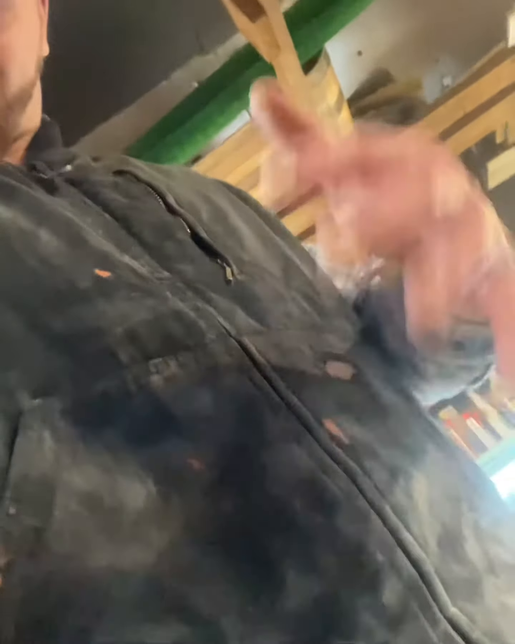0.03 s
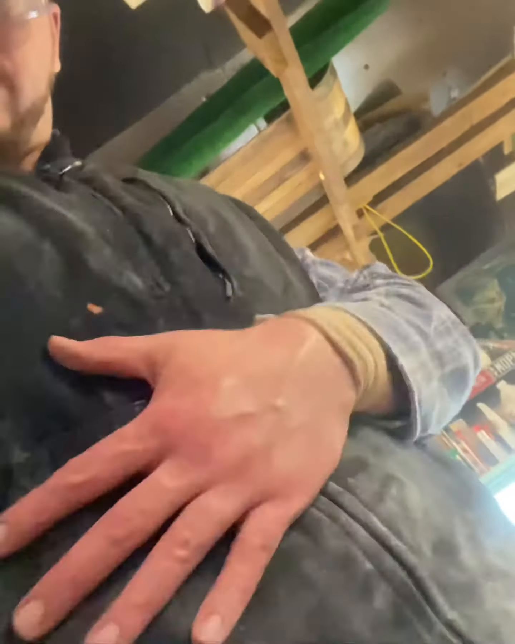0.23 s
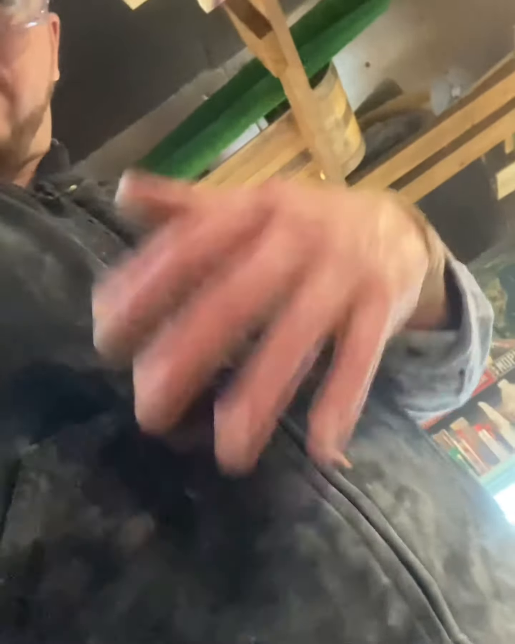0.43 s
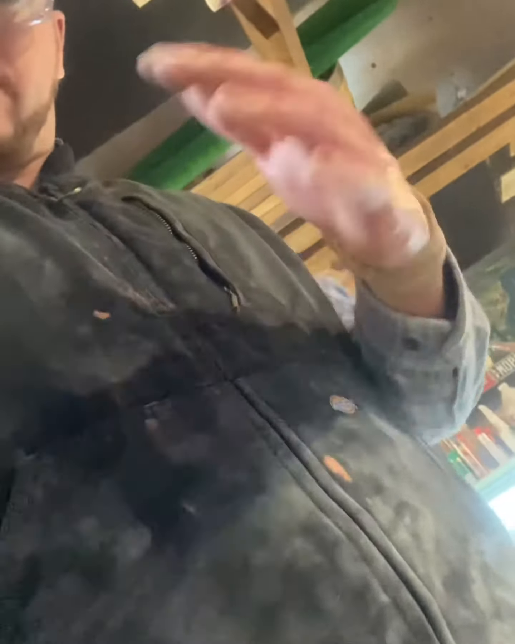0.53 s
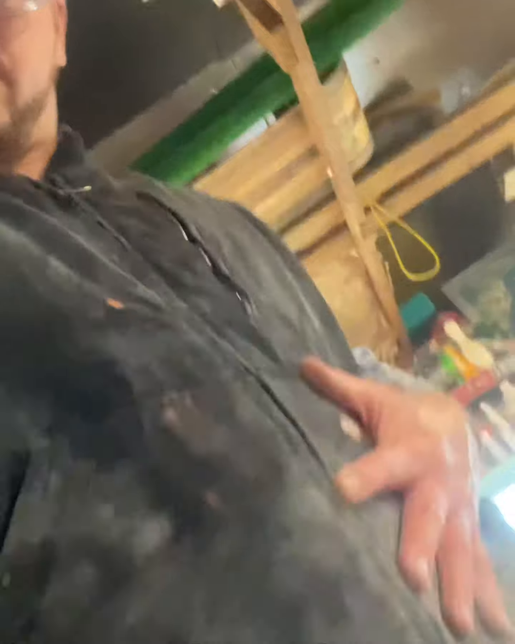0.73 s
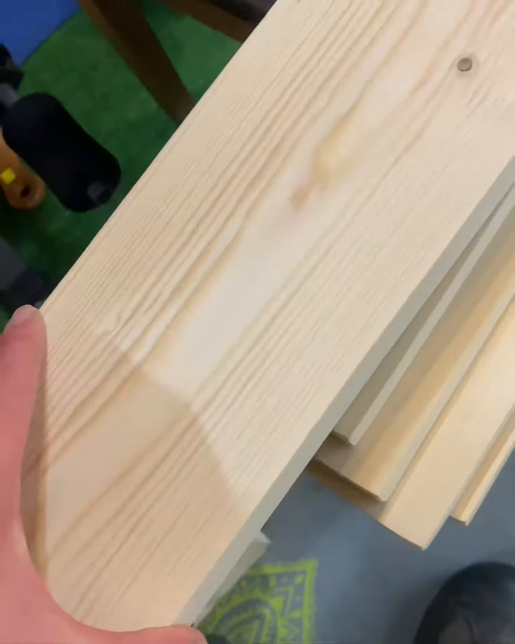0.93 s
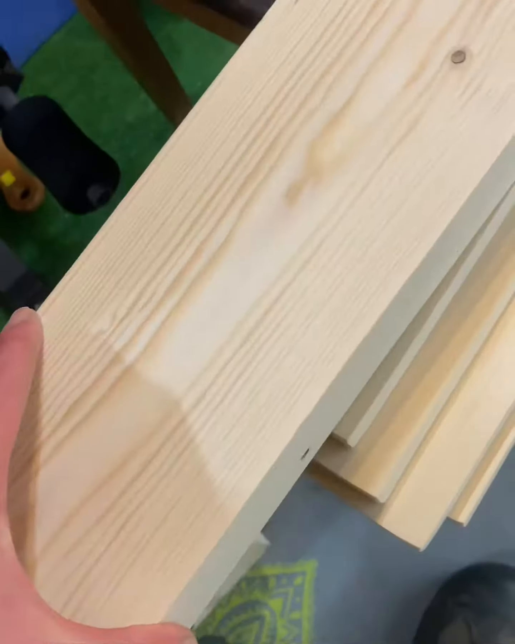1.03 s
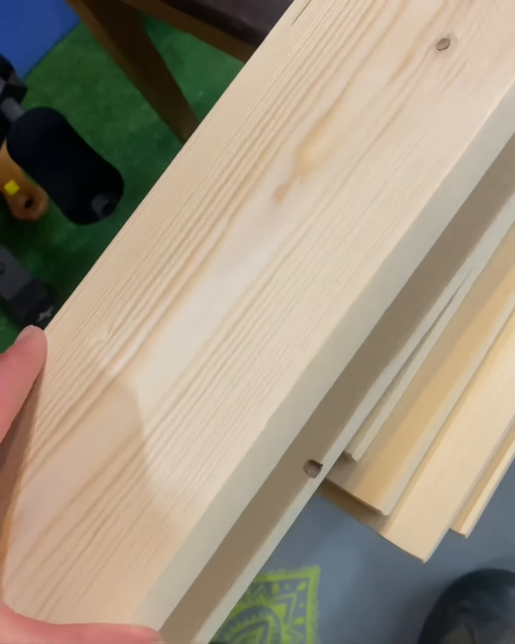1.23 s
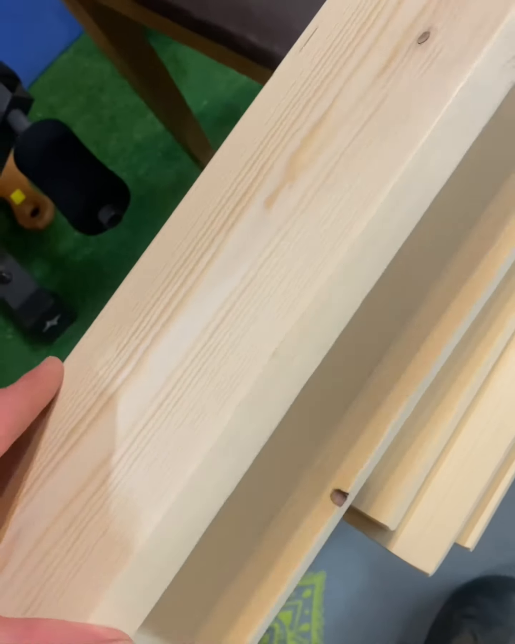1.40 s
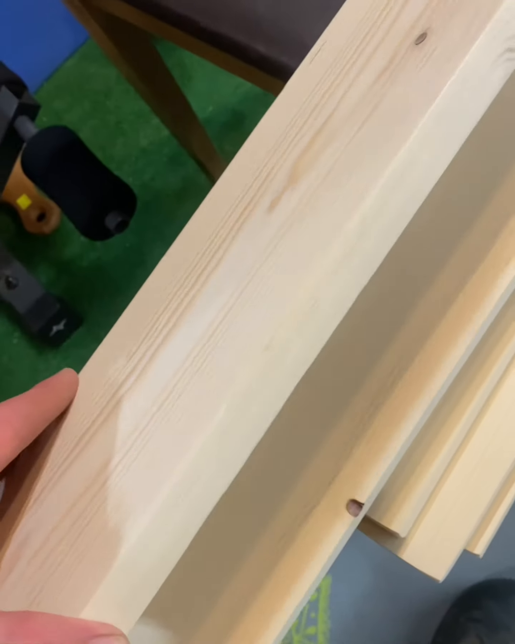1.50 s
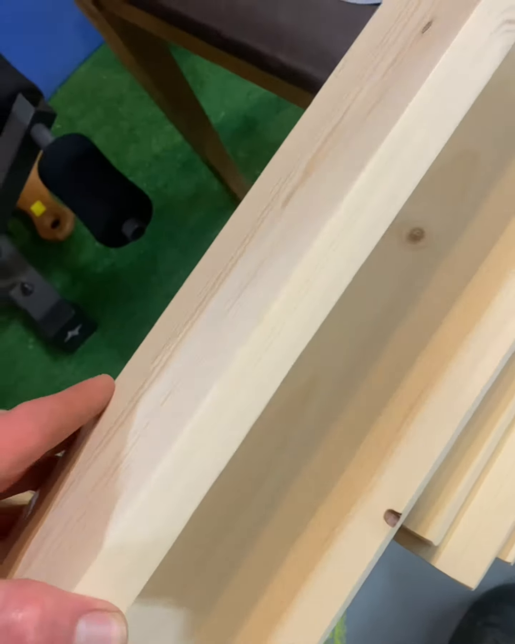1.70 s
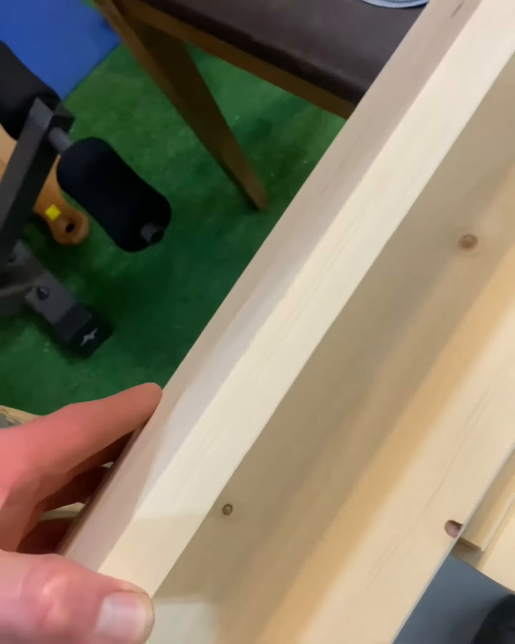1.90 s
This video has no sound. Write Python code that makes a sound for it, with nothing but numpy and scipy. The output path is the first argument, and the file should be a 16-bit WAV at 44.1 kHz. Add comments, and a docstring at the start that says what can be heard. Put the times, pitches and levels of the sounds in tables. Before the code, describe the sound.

Two quick, sharp slaps land on a padded jacket half a second apart, very near the microphone in a small workshop. Faint handling rumble runs underneath, and afterwards a low fan hum suddenly grows clearer and slightly whines.

```python
"""A small workshop, a phone's microphone held close to a padded work jacket, the stereo widened.
A hand slaps the jacket twice: cloth brushes, fingers and palm crack down, trapped air pops,
the chest thumps and the room rings briefly. The phone rumbles as it is moved in the other hand.
After the second slap the muffled background hum abruptly turns louder and clearer; a thin whine joins."""
import sys
import numpy as np
from scipy import signal
from scipy.fft import rfft, irfft
from scipy.io import wavfile
from scipy.ndimage import uniform_filter1d, minimum_filter1d

SR = 44100
rng = np.random.default_rng(int(sys.argv[2]) if len(sys.argv) > 2 else 0)


def to_wav(s):
    """Save 16-bit WAV."""
    ch = np.atleast_2d(s).T  # columns
    pcm = np.round(np.clip(ch, -1, 1) * 32767)  # PCM
    wavfile.write(sys.argv[1], SR, pcm.astype(np.int16))


N = 85995

# the flat palm, then the brighter fingers
# (time [s], cloth [dB], room [dB], hollow ring [dB], knock band [dB], snap band [dB])
SLAPS = [(0.1845, -16.5, -26.5, 1.5, 1, -4), (0.6695, -19, -24, -5.5, -3, 2)]
# stereo widening of the room sound, nearly opposite in the mids (frequency [Hz], lead of the left [rad])
ROOM_PHASE = [(60, 0.13), (130, 0.54), (260, 1.75), (600, 2.766), (850, 2.59), (1100, 2.92), (1800, 2.2),
              (4500, 1.64), (8000, 0.27)]


def slap(t, time, cloth_db, cup_db, knock_db, snap_db):
    """Each contact cracks on the fabric and squeezes out a pocket of air, right by the microphone."""
    # fingers and palm landing (time [s], crack [dB], air pop [dB], pop pitch [Hz], pop decay [s])
    contacts = [(0.1769, -15, -20.5, 520, 0.0027), (0.1846, -8, -7, 612, 0.0028),
                (0.1861, 2.5, -14, 1020, 0.0017), (0.1873, -0.5, -7.5, 393, .003),
                (0.1881, -6.5, -8, 605, 0.0026), (0.1950, -17.5, -22, 660, 0.0037),
                (0.6585, -24, -18.5, 810, 0.004), (0.6606, -37, -30, 790, 0.0022),
                (0.6684, 1, -8, 687, 0.0019), (0.6703, -5, -14.5, 375, 0.0023),
                (0.6734, -3.5, -16, 384, 0.0038), (0.6755, -11.5, -9.5, 680, 0.0013),
                (0.696, -27, -40, 710, .003)]
    # colour of struck fabric (frequency [Hz], level [dB])
    crack_colour = [(100, -14.5), (400, 4.5), (900, 5.5), (1500, 1), (2200, 1.5), (3300, 1), (5500, -4.5),
                    (7200, -11.5), (10000, -33), (13000, -53)]
    cracks, pops = np.zeros(N), np.zeros(N)
    grit, grit_decay_s = 0.077 * rng.standard_normal(N), 0.0017
    for start, crack_db, pop_db, hz, decay in contacts:
        if abs(start - time) < .1:  # the contacts of this slap
            cracks[int(start * SR)] += undb(crack_db)
            cracks += undb(crack_db) * grit * (t > start) * np.exp(-np.abs(t - start) / grit_decay_s)
            pop = sagging_ring(t - start, hz, hz * 0.76, sag_s=0.0059, rise_s=0.00075, decay_s=decay)
            pops += undb(pop_db) * pop
    sound = strike(cracks, crack_colour) + undb(cup_db) * cup(cracks) + pops
    sound += undb(cloth_db) * cloth(t - time)
    tone_db = knock_db * bell(hz=1050) + snap_db * bell(hz=4430)
    return irfft(rfft(sound) * undb(tone_db), N)


def cup(cracks):
    """The hollow under the hand rings for a few milliseconds."""
    # rings of the cupped hand and taut fabric (frequency [Hz], level [dB], decay [s])
    modes = [(560, -45, 0.0054), (1000, -25, 0.0027), (1360, -24, 0.006), (1880, -40, 0.0015),
             (2300, -18, 0.0036), (3240, -20, 0.0022), (5090, -21, 0.0011)]
    age = np.arange(2048) / SR
    ring = sum(undb(db) * np.sin(2 * np.pi * hz * age) * np.exp(-age / decay) for hz, db, decay in modes)
    return signal.fftconvolve(cracks, ring)[:N]


def cloth(age):
    """The jacket crinkles under the hand: a quick press inside a longer, softer brush."""
    # colour of crinkling cloth (frequency [Hz], level [dB])
    colour = [(60, 14), (180, -14), (320, 4.5), (750, 13), (1000, 9), (1500, 6.5), (3000, -11),
              (5600, -9.5), (7500, -21.5), (10500, -40), (13000, -52)]
    press = swell(age, rise_s=0.0019, fall_s=0.0046)
    brush = undb(-2.5) * swell(age, rise_s=0.0073, fall_s=0.0095)
    grain_depth = 0.27
    grain = np.exp(grain_depth * walk(1200) - grain_depth ** 2)
    return (press + brush) * grain * noise(colour)


def chest(t):
    """Chest and padding give way under the hand with a low, falling thump."""
    # (time [s], first pitch [Hz], last pitch [Hz], level [dB], rise [s], decay [s])
    thumps = [(0.1906, 93, 40.5, -12.5, 0.0143, 0.014), (0.6791, 155, 98, -14, 0.005, 0.0049),
              (0.7040, 62, 53, -34.5, 0.0036, 0.048)]
    return sum(undb(db) * sagging_ring(t - start, first, last, sag_s=0.021, rise_s=rise, decay_s=decay)
               for start, first, last, db, rise, decay in thumps)


def room_tails(t):
    """The workshop rings briefly after each slap, and a faint hiss lingers."""
    # colours of the room's ring and of the hiss (frequency [Hz], level [dB])
    ring_colour = [(60, -17), (200, 6), (330, 6), (760, 10.5), (1000, 4), (2500, -10), (5500, -10),
                   (8000, -28.5), (11000, -35), (14000, -50)]
    hiss_colour = [(300, -2), (2000, -6), (4000, -4.5), (6300, -2.5), (8000, -14.5), (11000, -21),
                   (13000, -22)]
    build_s, decay_s = 0.0058, 0.026
    hiss_db, hold_s, fade_s = -54.5, 0.12, 0.032
    ring = sum(undb(db) * swell(t - time - build_s, build_s / 2, decay_s) for time, _, db, *_ in SLAPS)
    linger = sum((t > time) * np.exp(-np.maximum(t - time - hold_s, 0) / fade_s) for time, *_ in SLAPS)
    return ring * field(ring_colour) + undb(hiss_db) * linger * field(hiss_colour)


def handling(t):
    """Low rumble of the phone moving in the other hand."""
    # colour of the rumble (frequency [Hz], level [dB])
    colour = [(15, -19), (30, -12.5), (55, 10), (75, -1), (110, -7.5), (200, -22), (600, -74.5)]
    # its swells (time [s], level [dB])
    level = [(0, -46), (.15, -48.5), (.25, -52), (.33, -42.5), (.45, -50.5), (.62, -40), (.78, -47.5),
             (.86, -35.5), (.98, -54), (1.3, -68.5), (1.75, -62), (1.86, -51.5), (1.95, -63)]
    return undb(np.interp(t, *np.array(level).T)) * field(colour)


def machine(t):
    """A fan runs in the background: rushing air and hum, muffled, then abruptly louder and clearer."""
    # colours of the rushing air (frequency [Hz], level [dB])
    muffled_colour = [(30, -39), (100, -17), (160, -5), (210, -8), (370, 1), (600, -5.5), (850, -0.5),
                      (1150, -6.5), (1800, -5), (2600, -15), (4200, -13.5), (6200, -20.5), (8000, -36.5),
                      (10500, -43.5), (13000, -56)]
    clear_colour = [(25, -6.5), (55, 5), (120, -4), (190, -2.5), (250, 1), (380, 3.5), (520, -4.5),
                    (620, 1.5), (780, -5), (900, 1), (1030, 4), (1200, -6.5), (1700, -6.5), (2200, -12),
                    (2600, -11.5), (3600, -14.5), (4500, -12), (6200, -24.5), (7600, -44), (10500, -38),
                    (13000, -49)]
    # stereo widening of the fan (frequency [Hz], lead of the left [rad])
    phase = [(60, .1), (130, 2.2), (230, 2.25), (350, 2.43), (550, 2.82), (790, 3.08), (1050, 3.45),
             (1250, 2.18), (1900, 2.03), (2170, 1.3), (2700, 2.43), (4200, 1.36), (8000, .8)]
    clears_s, crossfade_s = .927, 0.0043
    clear = np.clip((t - clears_s) / crossfade_s + .5, 0, 1)
    air = (1 - clear) * undb(-50) * field(muffled_colour)
    air += clear * undb(-43.5) * field(clear_colour, phase)
    return air + widen_room(fan_hum(clear), fan_hum(clear), phase)


def fan_hum(clear):
    """The fan's hum wavers in pitch and level; a thin whine joins as the sound turns clearer."""
    # hum lines (frequency [Hz], muffled level [dB], clear level [dB])
    lines = [(158, -57, -56.5), (236.6, -67.5, -50.5), (405, -75, -60.5)]
    hum = np.zeros(N)
    for hz, muffled_db, clear_db in lines:
        level = undb(muffled_db + (clear_db - muffled_db) * clear)
        flutter = 1 + 0.36 * walk(27)
        hum += level * flutter * sine(hz + 2.97 * walk(16.6))
    whine = clear * undb(-58) * walk(123) * sine(2170 + 25 * walk(39.5))
    return np.sqrt(2) * (hum + whine) * signal.windows.tukey(N, .01)


def widen_close(x):
    """Stereo widening of a close sound: left and right differ in level and phase."""
    # nearly opposite in the mids (frequency [Hz], lead of the left [rad])
    phase = [(50, 0.09), (160, 0.42), (230, 0.52), (350, 1.9), (600, 3), (1000, 3.6), (1500, 4.1),
             (2300, 4), (3300, 5.03), (6000, 5.51)]
    # (frequency [Hz], left minus right [dB])
    balance = [(100, -1), (900, -.5), (1400, 7), (2500, 1), (4500, 2.5), (8000, 0)]
    tilt = undb(at_hz(balance) / 2)
    return irfft(rfft(x) * np.array([tilt, np.exp(-1j * at_hz(phase)) / tilt]), N)


def widen_room(x, other, phase):
    """Stereo widening of room sound: the right is shifted in phase and partly unrelated to the left."""
    # (frequency [Hz], unrelated share of the power [0-1])
    diffuse = [(50, 0.52), (140, 0.86), (240, 0.03), (400, 0.0067), (600, 0.039), (820, 0.011),
               (1400, 0.25), (3000, 0.61), (8000, 0.87)]
    share = at_hz(diffuse).clip(0, 1)
    common = rfft(x) * np.sqrt(1 - share) * np.exp(-1j * at_hz(phase))
    right = irfft(common + rfft(other) * np.sqrt(share), N)
    return np.array([x, right])


def field(colour, phase=ROOM_PHASE):
    """Coloured noise that fills the room."""
    return widen_room(noise(colour), noise(colour), phase)


def undb(db):
    """Decibels to gain."""
    return 10 ** (np.asarray(db) / 20)


def at_hz(points, size=N):
    """A table of (frequency [Hz], value) read at every frequency bin."""
    hz, value = np.array(points, float).T
    bins_hz = np.arange(size // 2 + 1) * SR / size
    return np.interp(np.log(bins_hz + 1e-9), np.log(hz), value)


def bell(hz, width_octaves=0.3):
    """A bell on the frequency axis, 1 at its centre."""
    octaves = np.log2(np.fft.rfftfreq(N, 1 / SR) / hz + 1e-9)
    return np.exp(-.5 * (octaves / width_octaves) ** 2)


def noise(colour):
    """Coloured noise of unit rms."""
    x = irfft(rfft(rng.standard_normal(N)) * undb(at_hz(colour)), N)
    return x / x.std()


def walk(rate_hz):
    """Smooth random wander with a spread of 1."""
    span = int(SR / rate_hz)
    x = uniform_filter1d(rng.standard_normal(N), span, mode="wrap")
    x = uniform_filter1d(x, span, mode="wrap")
    return x / x.std()


def sine(hz):
    """A tone that follows a moving pitch."""
    return np.sin(2 * np.pi * np.cumsum(hz) / SR)


def strike(x, colour, size=1024):
    """Rings x through a colour's causal response, scaled to a peak of 1."""
    cepstrum = irfft(np.log(undb(at_hz(colour, size))))
    cepstrum[1:size // 2] *= 2
    cepstrum[size // 2 + 1:] = 0
    response = irfft(np.exp(rfft(cepstrum)))
    return signal.fftconvolve(x, response / np.abs(response).max())[:N]


def swell(age, rise_s, fall_s):
    """Exponential rise to a peak at age 0, then exponential fall."""
    return np.exp(np.minimum(age / rise_s, -age / fall_s))


def sagging_ring(age, first_hz, last_hz, sag_s, rise_s, decay_s):
    """A damped swing whose pitch falls."""
    age = np.maximum(age, 0)
    cycles = last_hz * age + (first_hz - last_hz) * sag_s * (1 - np.exp(-age / sag_s))
    fall = np.exp(-(age - rise_s * 1.12) / decay_s).clip(0, 1)
    return np.sin(2 * np.pi * cycles) * np.minimum(np.sqrt(age / rise_s), fall)


def scene():
    """Slaps close to the microphone, over room, machine and handling."""
    t = np.arange(N) / SR
    hand = sum(slap(t, time, cloth_db, *tone) for time, cloth_db, _, *tone in SLAPS)
    return widen_close(hand + chest(t)) + room_tails(t) + machine(t) + handling(t)


def record(dry):
    """The microphone dulls the extreme treble, a limiter ducks the highest peaks, and the top is cut."""
    microphone_top_hz, cut_hz = 11600, 15700
    ceiling, limiter_s = .88, 0.0011
    heard = signal.sosfilt(signal.butter(10, microphone_top_hz, fs=SR, output="sos"), dry)
    span = int(limiter_s * SR)
    gain = np.minimum(1, ceiling / (np.abs(heard).max(axis=0) + 1e-9))
    limited = heard * uniform_filter1d(minimum_filter1d(gain, span), span)
    return signal.sosfilt(signal.ellip(8, .2, 70, cut_hz, fs=SR, output="sos"), limited)


dry = scene()
out = record(dry)
to_wav(out)
```